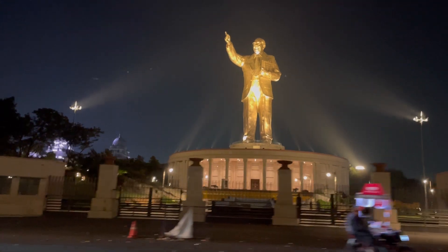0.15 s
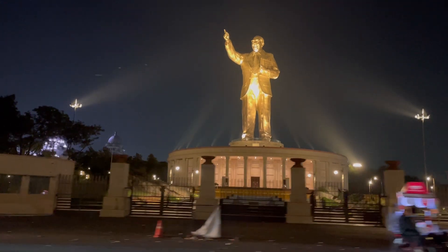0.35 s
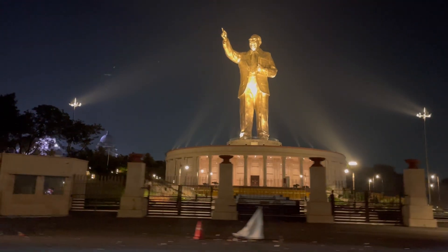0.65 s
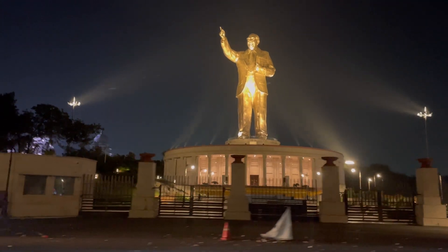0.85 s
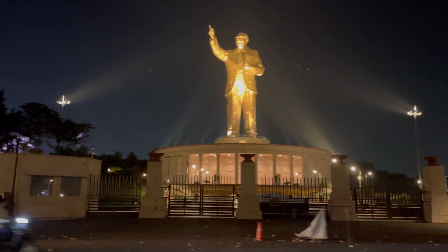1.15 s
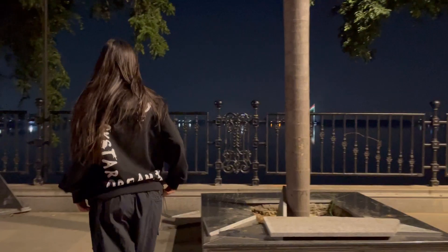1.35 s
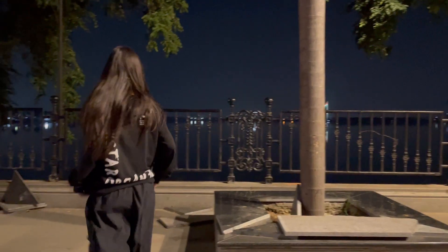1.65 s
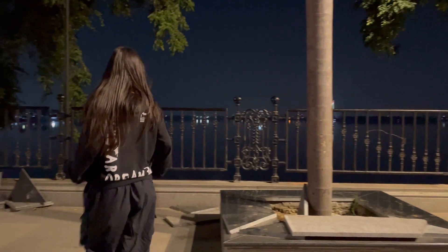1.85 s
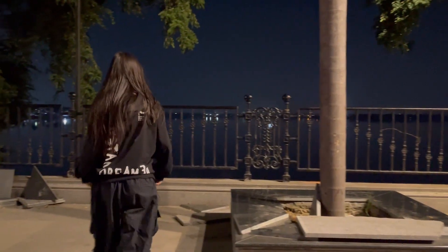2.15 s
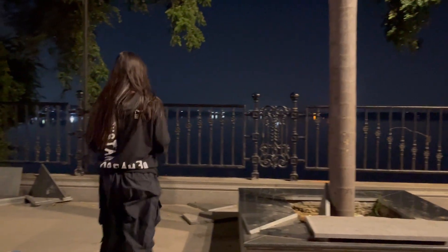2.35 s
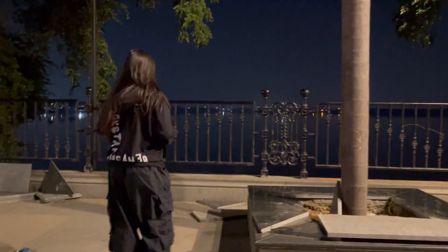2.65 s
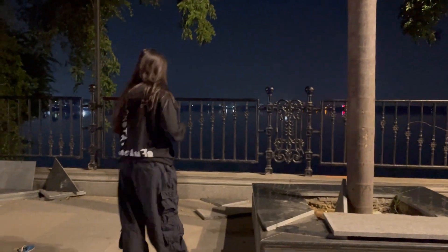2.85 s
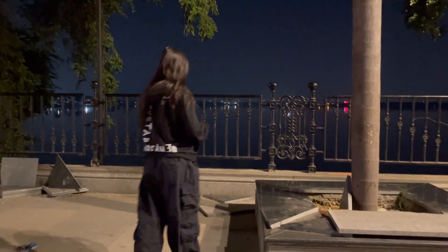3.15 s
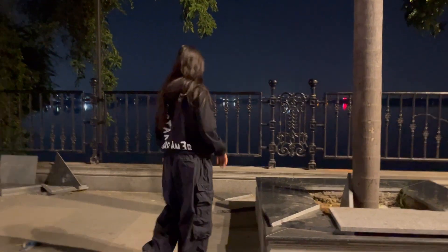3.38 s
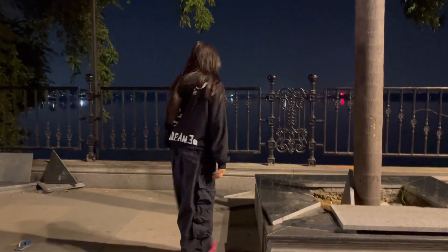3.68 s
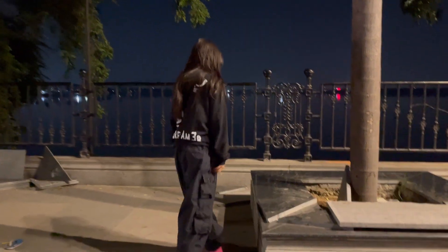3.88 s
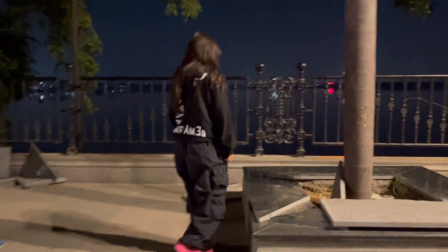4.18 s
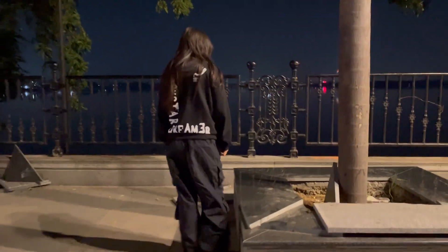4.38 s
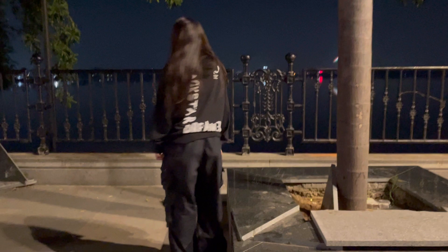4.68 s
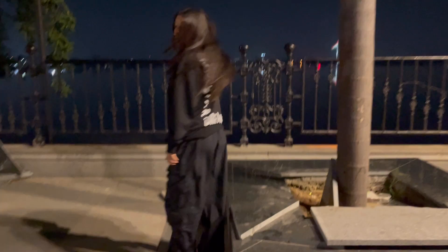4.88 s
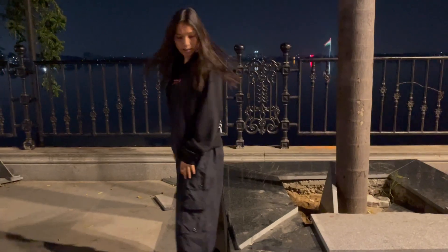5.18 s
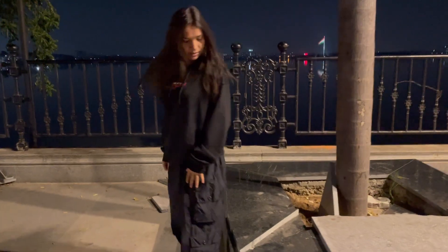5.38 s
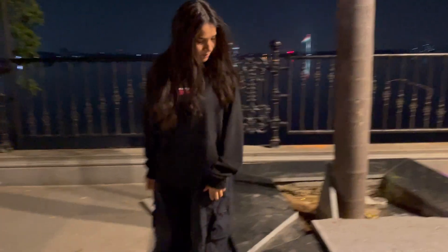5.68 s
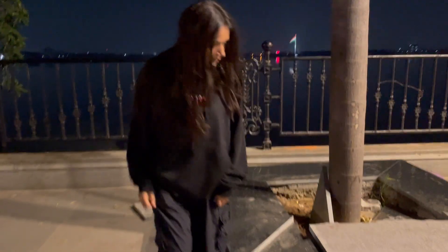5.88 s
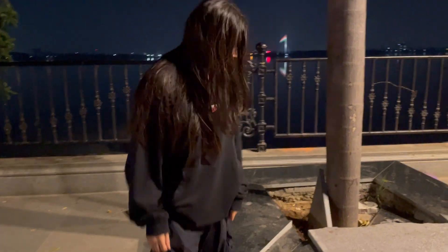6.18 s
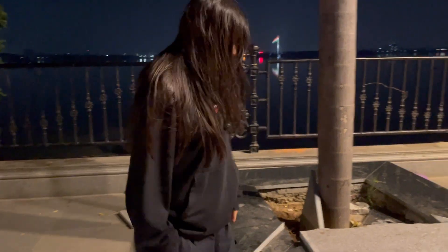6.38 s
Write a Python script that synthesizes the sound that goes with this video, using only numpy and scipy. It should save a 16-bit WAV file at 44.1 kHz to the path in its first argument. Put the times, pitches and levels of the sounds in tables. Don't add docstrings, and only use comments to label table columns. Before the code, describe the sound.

From 0 to 1.3 s, a loud open roadside at night: tyre rumble, roar and hiss drawing nearer, a nearby vehicle's mid-high gear whine with a thinner whirr above. Wind strikes the phone microphone in lumpy thuds and flutters, strongest around 0.1 and 0.55 s, with crackles; brief low moans whistle near 1.0 to 1.25 s. A hard cut at 1.33 s quickly fades in a far quieter waterside walk. Distant traffic hums from the left and a lorry's low drone sinks away until 3.8 s. Dry grit scuffs sound close by, notably at 2.1, 2.7, 3.2, 4.27 and 6.4 s. A thin, high, faint horn flickers from 2.6 to 4 s. Tyres sing softly around 4 to 5 s and again after 6 s, while a bus hum with exhaust rasp and thin engine drones build, traffic swelling gently until the end at 6.5 s.

```python
import sys
import numpy as np
from scipy import signal
from scipy.io import wavfile
from scipy.ndimage import uniform_filter1d

SR = 44100
rng = np.random.default_rng(int(sys.argv[2]) if len(sys.argv) > 2 else 0)


def pcm_store(signal):
    levels = np.round(np.clip(np.atleast_2d(signal), -1, 1) * 32767)
    wavfile.write(sys.argv[1], SR, levels.astype(np.int16).T)


def undo_db(level):
    steps = np.asarray(level, float) / 20
    return 10 ** steps


N = 287973
T = np.arange(N) / SR
CUT_S = 1.3255
BEND = .035
# pitch_hz, left_minus_right_db
ROAD_TILT = [(60, 0.5), (900, -0.5), (1550, 5.5), (2240, 2), (5530, 6), (13700, -2)]


def evened(x):
    return x / np.sqrt(np.mean(x ** 2) + 1e-20)


def read(points, hz):
    f, value = np.transpose(points)
    return np.interp(np.log(hz + 1), np.log(f + 1), value)


def curves(rows, t=T):
    s, *columns = np.transpose(rows)
    return [np.interp(t, s, c) for c in columns]


def wander(size):
    return evened(uniform_filter1d(uniform_filter1d(rng.standard_normal(N), size), size))


def swells(rows):
    return sum(undo_db(db) ** 2 * np.exp(-2 * ((T - s) / half) ** 2) for s, half, db in rows)


def gate(t0, t1, edge):
    return np.clip(np.minimum(T - t0, t1 - T) / edge, 0, 1)


def resonate(x, hz, width):
    turn = np.exp(2j * np.pi * np.cumsum(hz * np.ones(N)) / SR)
    r = np.exp(-np.pi * width / SR)
    return (turn * signal.lfilter([1], np.convolve([1, -r], [1, -r]), x / turn)).real


def fuzzy(hz, db, width):
    return undo_db(db) * evened(resonate(rng.standard_normal(N), hz, width))


def tone(hz, db, waver_db):
    cycles = np.cumsum(hz + 0 * T) / SR + rng.random()
    return np.sqrt(2) * undo_db(db + waver_db * wander(size=2500)) * np.sin(2 * np.pi * cycles)


def placed(x, lag, pan_db=0.):
    return np.array([np.roll(x, round(lag)), x]) * undo_db([[pan_db / 2], [-pan_db / 2]])


def noise(colour, bearing, patchy_db, knee_hz=250, tilt=((0, 0), (1, 0)), direct=1, bend=0):
    frames = min(round(bearing[-1][0] * SR), N) // 256 + 5
    hz = np.fft.rfftfreq(1024, 1 / SR)[:, None]
    lag, share, pan_db = curves(bearing, np.arange(frames) * 256 / SR)
    a, b, c, d, patches = rng.standard_normal((frames, 513, 5)).T
    patches = evened(uniform_filter1d(uniform_filter1d(patches, 10, 0), 12, 1))

    low, high = 1 / (1 + (hz / knee_hz) ** 3), 1 / (1 + (5600 / (hz + 1)) ** 12)
    body = .83 * np.exp(2j * np.pi * (hz - 5050) / 6400)
    spread = 1 + (lag * hz / SR / 1.6) ** 6
    phase = lag * (2 * np.pi * hz / SR - bend * (1 - low))
    middle = (1 - high) * np.exp(1j * phase) * share * direct / spread
    same = low + (1 - low) * (middle + high * body)
    same = same / np.maximum(abs(same), 1)
    left, own = a + 1j * b, c + 1j * d
    z = np.array([left, same * left + np.sqrt(1 - np.minimum(abs(same), 1) ** 2) * own])

    lean_db = read(tilt, hz) + pan_db * hz / (hz + 1500) / (1 + (hz / 7200) ** 8)
    beyond_db = -30 * np.log2(np.maximum(hz / colour[-1][0], 1))
    z = z * undo_db(read(colour, hz) + beyond_db + patchy_db * patches) * undo_db([lean_db / 2, -lean_db / 2])
    sound = evened(signal.istft(z, nperseg=1024, noverlap=768)[1][:, :N])
    return np.pad(sound, ((0, 0), (0, N - sound.shape[1])))


def traffic(nearer, rows, start, end, tyres, bearing, tilt):
    # pitch_hz, level_db
    rumble = [(20, -40), (30, -20), (42, 5), (60, 7.5), (100, 1.5), (200, -5.5), (400, -9), (700, -14.5),
              (1200, -37)]
    grit = [(2500, 0.5), (3500, 2.5), (5000, 3.5), (6000, -2), (7200, -1), (9000, -52)]
    hiss = [(6000, -12), (7500, 3.5), (9000, 4), (11000, 1), (13000, -4.5), (15000, -7), (16000, -20)]
    straight = (.55, 1, .45, 1)
    near_db = curves(nearer)[0]
    leaving = np.exp(-abs(T - start) / 0.48)
    arriving = np.exp(-abs(end - T) / 1)
    surge = wander(size=3000)
    patchy_db, surge_db = (1.0, 1.33, 1.7, 1.8), (0.74, 0.06, 0.38, 0.42)
    out = 0
    for i, (db, share, old_db, new_db) in enumerate(rows):
        level_db = db + share * near_db + old_db * leaving + new_db * arriving + surge_db[i] * surge
        colour = (rumble, tyres, grit, hiss)[i]
        out = out + undo_db(level_db) * noise(colour, bearing, patchy_db[i], 160, tilt, straight[i], BEND)
    return out


def road_traffic():
    # time_s, gain_db
    nearer = [(0, -0.5), (.5, 0), (.9, 2.5), (1.33, 3.5)]
    # level_db, share of the approach, leaving_vehicle_db, arriving_vehicle_db
    road_layers = [
        (-22, -3.5, 2, .1),
        (-37, 0.43, 2, .1),
        (-41, 0.52, -1, .1),
        (-49.5, 1.16, 1, .1),
    ]
    # pitch_hz, level_db
    near_tyres = [(300, -18), (700, 6.5), (1400, 4), (1800, 1), (2500, 7), (3200, 5), (3700, -3.5),
                  (5000, -38)]
    # time_s, left port's lag_samples, share from that side, left_minus_right_db
    bearing = [(0, -1, .6, -5), (1.33, -1, .6, -5)]
    return traffic(nearer, road_layers, 0, CUT_S, near_tyres, bearing, ROAD_TILT)


def near_engine():
    # time_s, pitch_hz, level_db
    whine_path = [(0, 1995, -33), (.1, 2010, -34), (.17, 2010, -39), (.27, 2030, -34), (.44, 2000, -38),
                  (.55, 1995, -32), (.65, 1975, -39), (.9, 1985, -40), (1.05, 1995, -44), (1.15, 2005, -37),
                  (1.33, 1995, -38)]
    # time_s, pitch_hz, level_db
    whirr_path = [(0, 3015, -42), (.38, 2990, -43), (.46, 2955, -42), (.75, 2915, -44), (.9, 2830, -44),
                  (1.1, 2820, -44), (1.19, 2815, -42), (1.33, 2800, -43)]
    # time_s, pitch_hz, level_db
    sinking = [(.8, 1960, -56), (.95, 1930, -44), (1.1, 1860, -43), (1.33, 1850, -45)]
    hz, db = curves(whine_path)
    whine = fuzzy(hz, db - 7.5 + 4 * T, 150)
    whine = whine + tone(hz + 5 * wander(size=1500), db - 2.5 - 3 * T, 1.5)
    whine = whine + fuzzy(hz + 65, db - 14 + 4 * T, 25) + fuzzy(*curves(sinking), 40)
    hz, db = curves(whirr_path)
    whirr = fuzzy(hz + 30, db - 6, 200)
    whirr = whirr + tone(hz + 5 * wander(size=1500), db - 5, 1.8) + tone(hz + 85, db - 7 - 8 * T, 2.)
    return placed(whine + whirr, lag=-1)


def wind():
    # time_s, level_db
    breeze = [(0.0, -45), (0.052, -32), (0.062, -19), (0.12, -18.5), (0.25, -24), (0.3, -27.5), (0.4, -18),
              (0.5, -30), (0.53, -20), (0.59, -19.5), (0.64, -22), (0.79, -22), (0.9, -21), (1.15, -17.5),
              (1.325, -26)]
    # start_s, length_s, level_db, flutter_over_thud_db
    gusts = [(0.01, 0.012, -25.5, -3), (0.054, 0.013, -18.5, 3), (0.06, 0.018, -15.5, 1),
             (0.075, 0.026, -15, 2), (0.099, 0.02, -10.5, -0.5), (0.134, 0.02, -20, -15),
             (0.156, 0.014, -13, 5.5), (0.188, 0.021, -18.5, 2.5), (0.215, 0.033, -16, -4.5),
             (0.301, 0.036, -27.5, 1), (0.34, 0.04, -28.5, 5), (.372, 0.045, -22.5, 4),
             (0.419, 0.017, -18, -6), (0.523, 0.022, -17.5, -1), (0.534, 0.044, -13.5, -1.5),
             (0.609, 0.037, -13.5, -4), (0.638, 0.055, -20.5, 3.5), (0.702, 0.039, -19, -17),
             (0.746, 0.041, -24.5, -4), (0.854, 0.032, -25, -1.5), (0.891, .03, -31, 5),
             (0.935, 0.1, -24, 1.5), (1.052, 0.059, -23, 0.5), (1.12, 0.037, -27.5, 3),
             (1.154, 0.082, -25, 3), (1.29, 0.042, -18.5, -13)]
    # peak_s, half_length_s, level_db
    pushes = [(0, 0.024, -23), (.085, 0.02, -10.5), (.13, 0.017, -20), (.165, 0.023, -17),
              (.24, 0.019, -19.5), (.33, 0.025, -33), (.424, 0.02, -23), (.55, 0.019, -28),
              (.64, 0.08, -24), (.86, 0.081, -24), (.985, 0.059, -16), (1.17, 0.025, -37),
              (1.28, 0.066, -20.5)]
    # pitch_hz, level_db
    boom = [(20, -30), (38, 0), (55, 25), (100, 16.5), (150, 8.5), (250, -5)]
    thud_colour = [(60, -24), (120, -1.5), (200, -1.5), (300, -1.5), (450, -7), (700, -13), (1200, -34)]
    flutter_colour = [(200, -11.5), (400, 1), (700, 4), (1000, 3), (1400, -5), (1800, -13), (2600, -20),
                      (4000, -75)]
    crackle = [(800, -23), (1500, -2), (2200, -1), (3200, -11), (5000, -19)]
    wind_shared = (.68, .95, .93, .85)

    thud = undo_db(curves(breeze)[0]) ** 2
    flutter = thud * undo_db(-6.5) ** 2
    for s, length, db, over_db in gusts:
        rise, fall = (T - s) / (.003 + .13 * length), (s + length - T) / .01
        shape = np.clip(np.minimum(rise, fall), 0, 1) ** 2
        thud = thud + shape * undo_db(db) ** 2
        flutter = flutter + shape * undo_db(db + over_db) ** 2
    crackling = undo_db(-27.5) ** 2 * np.minimum(flutter / undo_db(-11.5) ** 2, 1) ** 2.3
    powers = (undo_db(-53) ** 2 + swells(pushes), thud, flutter, crackling)
    lumps = wander(size=160)
    shakes_db = (.5 * lumps, 0.44 * lumps, 1.8 * lumps + 0.39 * wander(size=50), 1.5 * lumps)
    colours = (boom, thud_colour, flutter_colour, crackle)
    out = 0
    for power, shake_db, colour, share in zip(powers, shakes_db, colours, wind_shared):
        bearing = [(0, 7, share, 0), (1.33, 6.8, share, 0)]
        air = noise(colour, bearing, 1.4, knee_hz=8, tilt=ROAD_TILT, bend=-BEND)
        out = out + np.sqrt(power) * undo_db(shake_db) * air
    return out


def moans():
    # peak_s, half_length_s, pitch_hz, glide_hz_per_s, level_db
    whistles = [(0.979, 0.017, 200, -4, -19), (1.006, 0.031, 327, 300, -26), (1.057, 0.066, 285, 200, -23),
                (1.187, 0.035, 201, -1100, -18), (1.208, 0.034, 328, 1202, -25),
                (1.267, 0.045, 403, -200, -31), (1.16, 0.037, 508, 300, -28)]
    air = rng.standard_normal(N)
    out = 0
    for s, half, hz, glide, db in whistles:
        breath = evened(resonate(air, np.clip(hz + glide * (T - s), 50, 900), 44))
        whistle = np.sin(2 * np.pi * (hz + glide * (T - s) / 2) * (T - s))
        out = out + np.sqrt(swells([(s, half, db)])) * (breath + whistle)
    return placed(out / np.sqrt(1.5), lag=8)


def walk_traffic():
    # time_s, gain_db
    nearer = [(1.36, 0.5), (2.3, -0.5), (3.0, 2.5), (3.8, 3), (4.7, 7.5), (5.1, 7), (5.55, 9), (5.95, 7),
              (6.53, 11)]
    # level_db, share of the approach, leaving_vehicle_db, arriving_vehicle_db
    walk_layers = [
        (-32.5, 0.26, 4.1, 0.4),
        (-39, 0.97, 0.62, -4.5),
        (-53.5, 0.39, 5, 11),
        (-63, 0.53, 0.1, 8.5),
    ]
    # pitch_hz, level_db
    far_tyres = [(150, -53), (350, -53), (700, -11.5), (1050, -3.5), (1400, -10), (1760, -9.5), (2100, -13),
                 (2800, -17.5), (3800, -26), (5000, -28.5)]
    # time_s, left port's lag_samples, share from that side, left_minus_right_db
    bearing = [(1.33, 26, .7, 2), (2.2, 26, .55, 3), (2.4, -22.5, .75, 4), (3.8, -22, .8, 3),
               (5.3, -21, .8, 3), (5.6, -17, .5, 3), (6.0, -13, .3, 5), (6.53, -6, .2, 1)]
    # pitch_hz, left_minus_right_db
    walk_tilt = [(60, 2), (500, 1.5), (860, 2), (1500, -12.5), (1900, -3), (2700, -5.5), (3400, 0.5),
                 (13700, -2)]
    return traffic(nearer, walk_layers, CUT_S, N / SR, far_tyres, bearing, walk_tilt)


def far_engines():
    # time_s, firing_hz, level_db
    lorry = [(1.33, 54.5, -28.5), (1.6, 53.2, -28), (2.0, 52.3, -32.5), (2.5, 47.2, -35.5),
             (3.0, 49.14, -39), (3.5, 46.7, -38), (3.8, 45.9, -49)]
    # time_s, shaft_hz, load_db, how far the tailpipe faces the microphone (0-1)
    bus_path = [(2.6, 44.5, -43, .1), (3.0, 44.6, -39, .15), (4.3, 44.8, -41, .45), (4.68, 44.8, -32, 0),
                (5.22, 43.3, -43, .6), (5.42, 43.1, -33, .45), (5.85, 43, -34, .45), (6.13, 42.9, -35, 1),
                (6.53, 42.8, -32, .2)]
    bus_orders = [
        (2, 1.3, -0.2),
        (3, -9.5, 16.5),
        (5, -12, 5.5),
    ]
    # shaft order, level_under_load_db
    upper_orders = [(6, -21), (8, -19), (9, -16), (11, -19), (12, -18), (13, -19), (14, -22), (15, -22),
                    (16, -17), (18, -20), (20, -21), (21, -21)]
    # start_s, end_s, pitch_hz, level_db
    thin_drones = [(2.2, 3.6, 185, -49), (2.1, 2.8, 99, -39), (5.1, 6.0, 430.7, -43.5),
                   (4.9, 6.6, 382, -45), (5.1, 6.6, 694, -46), (5.4, 6.0, 915, -52), (6.1, 6.6, 755, -50),
                   (5.8, 6.6, 845, -51), (5.9, 6.5, 550, -50), (5.0, 5.7, 1174, -51), (4.1, 5.0, 398, -50),
                   (3.9, 5.1, 1771, -48.5), (4.5, 5.6, 1690, -51), (4.6, 5.3, 2280, -53),
                   (1.3, 1.9, 212, -45), (2.7, 3.6, 213, -47), (3.1, 3.7, 133, -43), (5.0, 5.4, 2810, -56),
                   (3.9, 5.2, 1050, -48.5), (3.9, 4.6, 975, -50), (6.2, 6.6, 170, -39),
                   (6.0, 6.6, 1020, -47), (5.9, 6.5, 1090, -50)]
    shaft, load_db, pipe = curves(bus_path)
    bus = sum(tone(k * shaft, load_db + db + pipe * pipe_db, .6) for k, db, pipe_db in bus_orders)
    rasp = sum(tone(k * shaft, load_db + pipe * 7 + db, 2.5) for k, db in upper_orders)
    present = gate(2.6, 7, .1)
    low = tone(*curves(lorry), .8) * gate(0, 3.8, .1) + bus * present
    drones = []
    for t0, t1, hz, db in thin_drones:
        drone = tone(hz + wander(size=6000), db - 1.5, 1.2) + fuzzy(hz, db - 6, 12)
        drones.append(drone * gate(t0, t1, .25))
    engines = placed(low, lag=-4, pan_db=1.4) + placed(rasp * present, lag=24)
    return engines + placed(sum(drones[::2]), lag=-24, pan_db=1.) + placed(sum(drones[1::2]), lag=-22)


def scuffs():
    # peak_s, half_length_s, level_db, brightness_db_per_octave
    steps = [(1.463, 0.03, -66, 7.5), (1.59, .02, -55, -1.5), (1.91, 0.11, -60, -1.5), (2.08, .007, -50, 5),
             (2.115, 0.038, -46, 0), (2.43, .045, -66, 6), (2.67, 0.061, -47, 3), (2.833, 0.025, -65, 8),
             (3.198, 0.037, -43.5, 1), (3.401, 0.04, -63.5, 3), (3.747, 0.021, -50, 4),
             (4.263, 0.011, -40.5, 1), (4.284, 0.0097, -45.5, -0.5), (4.47, .02, -63, 6.5),
             (4.815, 0.027, -54, -3), (5.31, .008, -56, 6.5), (5.326, 0.012, -47.5, 0),
             (5.637, 0.32, -56.5, -2), (5.862, 0.021, -47, 0), (5.92, 0.12, -57, 4.5),
             (6.334, 0.096, -48, 0), (6.415, 0.025, -40, 3)]
    ahead = [(0, 0, .6, 0), (7, 0, .6, 0)]
    dull = noise([(3000, -30), (4500, 0), (7000, -2), (10000, -8), (15000, -20)], ahead, 1.5)
    bright = noise([(6000, -25), (9000, -3), (12000, 0), (15500, -5)], ahead, 1.5)
    grain, out = undo_db(2.0 * wander(size=40)), np.zeros((2, N))
    for s, half, db, tilt in steps:
        away = np.where(T < s, (s - T) / 0.86, (T - s) / 0.86)
        shape = np.exp(-away ** 2 / half ** 2)
        out += shape * undo_db(db) * (undo_db(-3 * tilt) * dull + undo_db(3.7 * tilt - 20.0) * bright)
    return out * grain


def horn():
    # peak_s, half_length_s, level_db
    ninth = [(2.592, .018, -47), (2.665, .022, -55), (2.73, .025, -52), (2.775, .03, -48),
             (2.875, .025, -52), (2.934, .03, -40), (3.02, .045, -51.5), (3.105, .03, -49),
             (3.15, .035, -42), (3.205, .03, -48), (3.255, .033, -43), (3.305, .01, -53), (3.38, .02, -44),
             (3.42, .04, -41), (3.465, .02, -50), (3.51, .04, -44), (3.6, .05, -37), (3.675, .05, -40),
             (3.735, .025, -46), (3.78, .025, -50), (3.83, .015, -53), (3.98, .012, -55), (4.03, .022, -51)]
    # peak_s, half_length_s, level_db
    eighth = [(3.08, .05, -57), (3.22, .05, -58), (3.4, .05, -60), (3.68, .05, -54)]
    hz = 3856 + 4 * wander(size=1500)
    upper = tone(hz, 1.2 * wander(size=200) - .5, .3) + fuzzy(hz, -14, 120)
    partials = np.sqrt(swells(ninth)) * upper + np.sqrt(swells(eighth)) * fuzzy(hz * 8 / 9, 0, 40)
    partials = partials + fuzzy(hz, -58, 30)
    return placed(partials * gate(2.55, 4.1, .03), lag=-22, pan_db=6.)


def tread():
    # nearest_s, half_length_s, level_db
    passing = [
        [(4.1, 0.24, -41), (4.42, 0.079, -39.5), (4.72, .11, -39.5), (5.0, .15, -43), (5.35, .2, -44.5),
         (6.15, .15, -41), (6.45, .1, -47)],
        [(4.2, 0.23, -38), (4.7, .25, -44), (5.3, 0.18, -56), (5.7, .2, -49), (6.3, .2, -48)],
        [(4.0, 0.18, -59), (4.85, 0.18, -48), (5.45, 0.38, -52), (6.3, 0.44, -48)],
    ]
    # pitch_hz, width_hz
    bands = [
        (1720, 130),
        (1030, 110),
        (2400, 500),
    ]
    # time_s, pitch factor
    pitch_path = [(3.8, 1.01), (4.3, 1.01), (4.8, .99), (5.5, .975), (6.0, .98), (6.53, 1.01)]
    factor = curves(pitch_path)[0]
    song = 0
    for cars, (hz, width) in zip(passing, bands):
        song = song + np.sqrt(swells(cars)) * fuzzy(hz * factor, 0, width)
    return placed(song, lag=-22, pan_db=.8)


def scene():
    road = road_traffic() + near_engine() + wind() + moans()
    walk = walk_traffic() + far_engines() + scuffs() + horn() + tread()
    return np.where(T < CUT_S, road, walk)


def low_pass(x):
    return signal.sosfilt(signal.butter(12, 15800, fs=SR, output="sos"), x)


def record(dry):
    # low_hz, high_hz
    sum_gaps = [(7730, 8950), (13850, 22050)]
    difference_gaps = [(10650, 12650), (15300, 22050)]
    x = signal.sosfilt(signal.butter(7, 40, "high", fs=SR, output="sos"), dry)
    x = x / (1 + (x / .95) ** 8) ** (1 / 8)
    hz, _, z = signal.stft(np.array([x[0] + x[1], x[0] - x[1]]) / 2, SR, nperseg=1024)
    hz, frames = hz[:, None], z.shape[2]
    for part, gaps in enumerate((sum_gaps, difference_gaps)):
        for low_hz, high_hz in gaps:
            ragged = 380 * (rng.random((frames // 3 + 1, 2)) < .12).repeat(3, 0)[:frames].T
            z[part] *= (hz < low_hz + ragged[0]) | (hz > high_hz - ragged[1])
    floor_db = np.interp(hz, (8800, 11500, 12600, 13300, 14000), (-102, -96, -97.5, -104, -109))
    floor_db = floor_db - np.reshape((0, 12), (2, 1, 1))
    z *= abs(z) > undo_db(floor_db) * (hz > 8800)
    z[1] *= undo_db(0.36 * (hz > 8000))
    mid, side = signal.istft(z, SR, nperseg=1024)[1][:, :N]
    road_fade = np.clip(0.7 + (CUT_S - T) / 0.0057, 0, 1)
    walk_fade = np.clip((T - CUT_S) / 0.039, 0, 1)
    splice = np.where(T < CUT_S, road_fade, walk_fade)
    return low_pass(splice * np.array([mid + side, mid - side]))


dry = scene()
out = record(dry)
pcm_store(out)
```